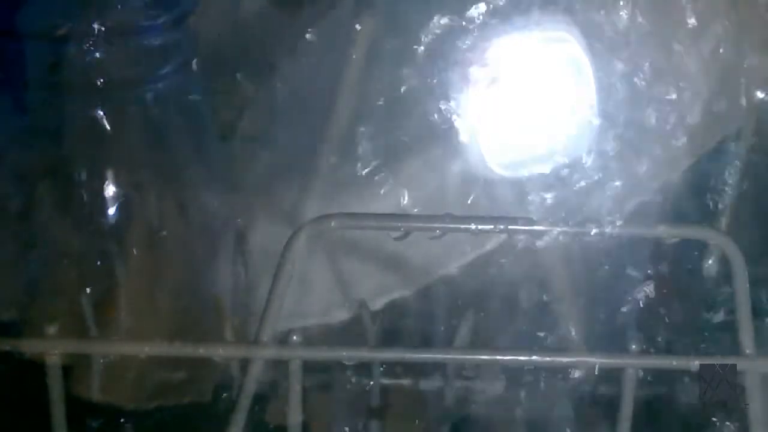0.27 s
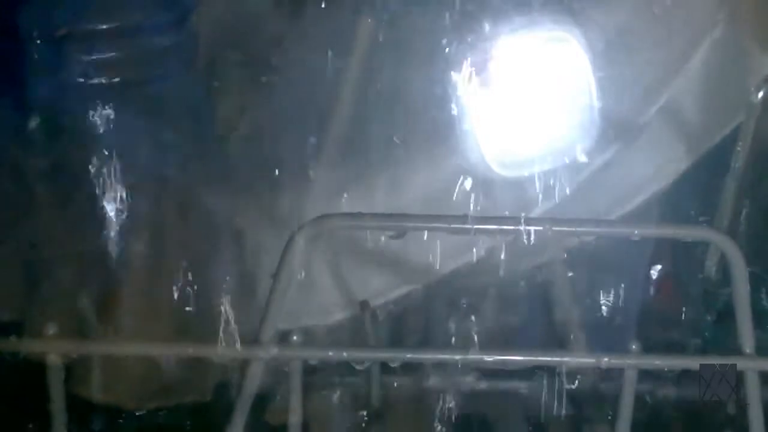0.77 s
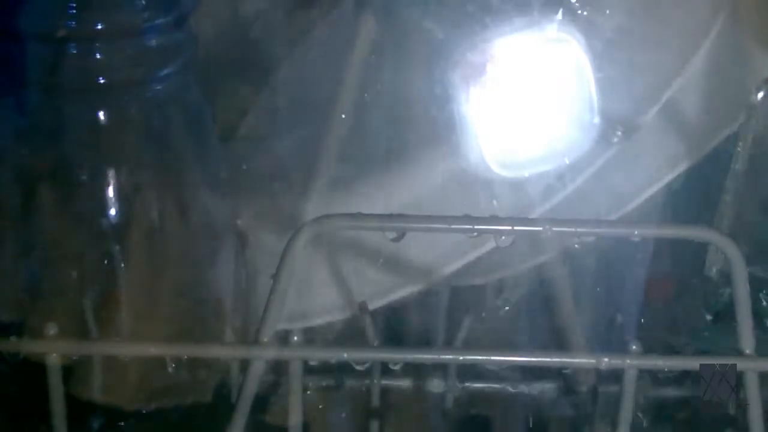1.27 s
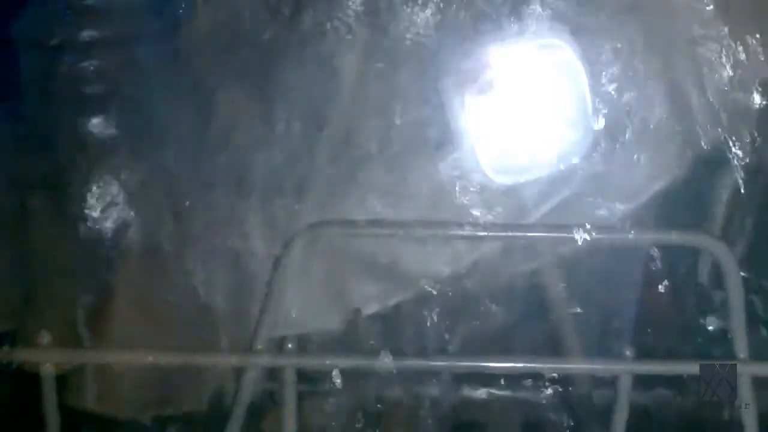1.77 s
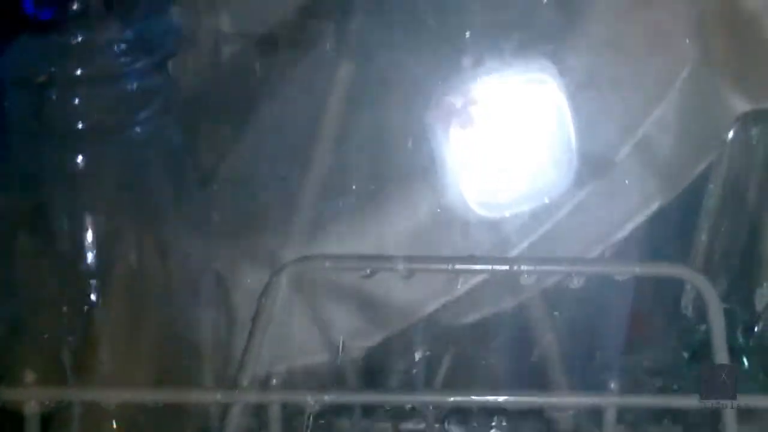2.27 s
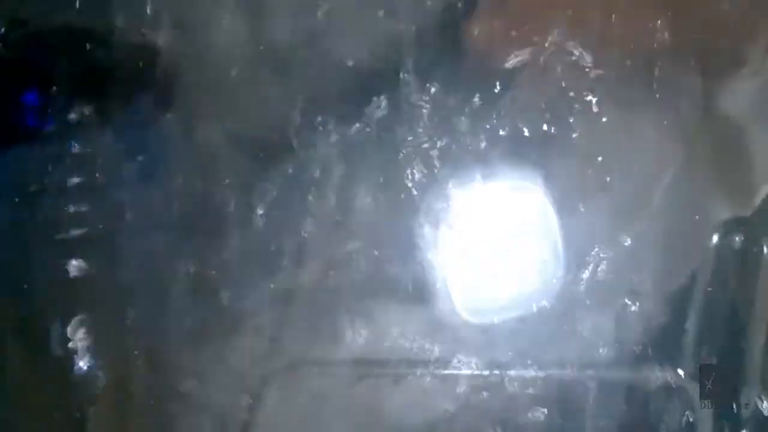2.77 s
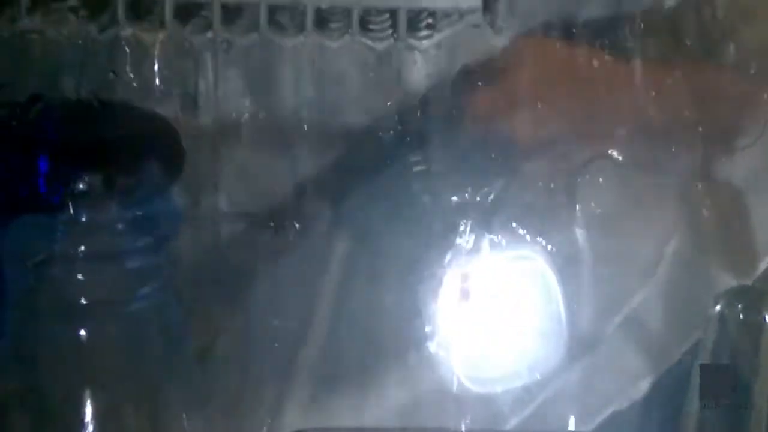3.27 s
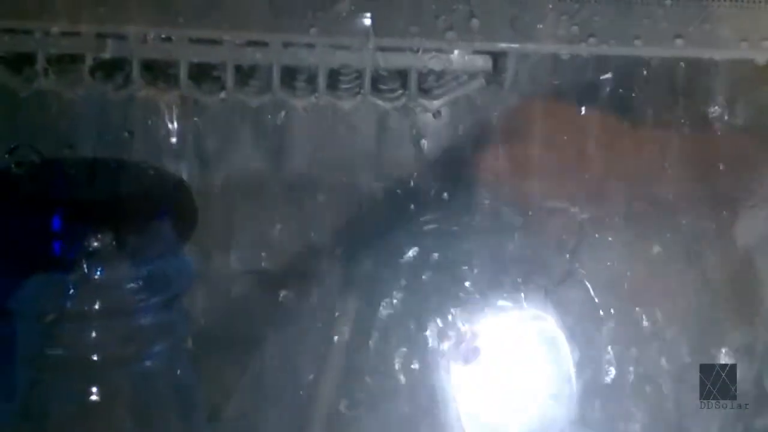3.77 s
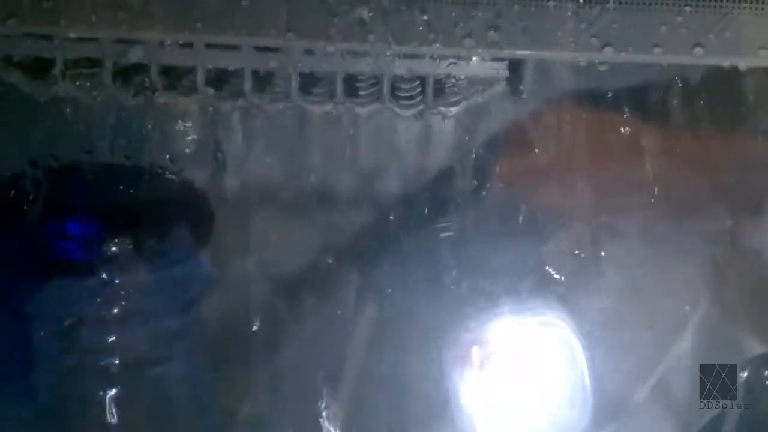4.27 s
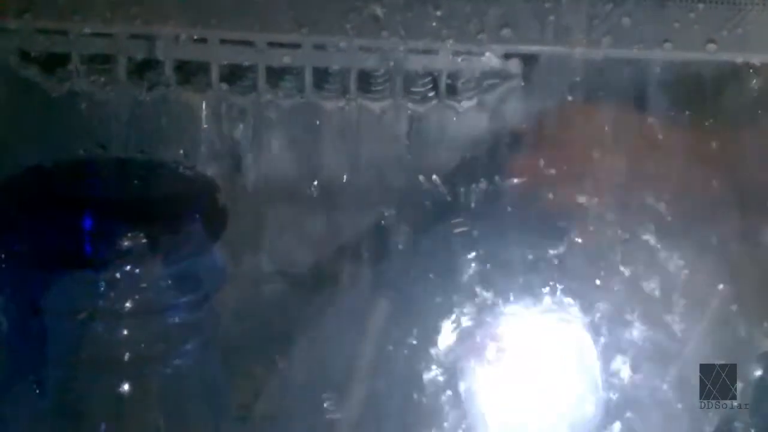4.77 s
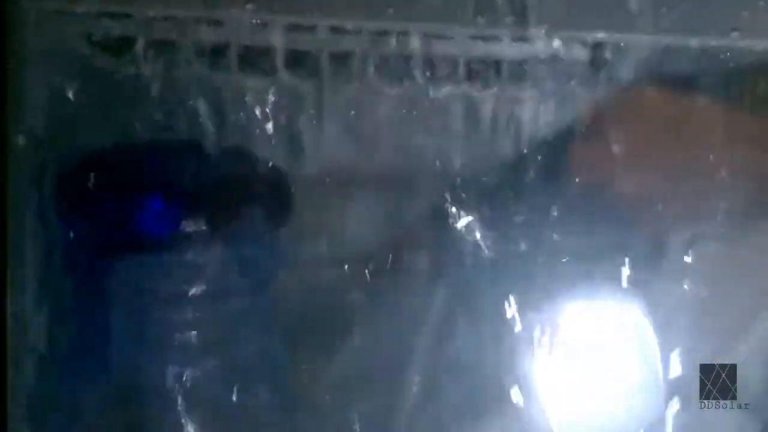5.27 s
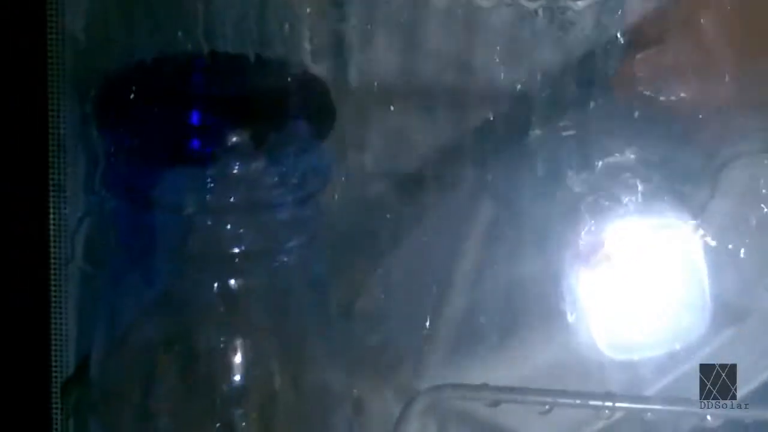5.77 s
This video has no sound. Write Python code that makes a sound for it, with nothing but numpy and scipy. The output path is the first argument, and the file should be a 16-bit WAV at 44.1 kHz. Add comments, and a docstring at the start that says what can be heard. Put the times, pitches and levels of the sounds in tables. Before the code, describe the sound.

A small dishwasher washes throughout, heard from a hand-held microphone right at its door. From the start the pump gives a steady, slightly wavering low hum. Jets of water sweep past in uneven surges, two or three a second: they drum deeply on the door, slosh at the bottom, rush along the walls and patter brightly on the dishes, with many small splashes. From about 1 second, shifting fingers add a deep, uneven rumble. The microphone bumps the door with light, dull knocks at about 2.1 and 2.2 seconds, and again around 3.3. A loud thud comes at 3.7 seconds, a sharper rattling knock at 4.9, the hardest knock at about 5.4, and another loud one at 6 seconds, with faint bumps between. The washing dips very briefly in level after each loud knock and carries on to the end.

```python
"""A small dishwasher washes, heard from a hand-held camera right at its door.
From the start the pump hums and jets of water sweep past: they drum on the door, slosh at the bottom,
rush along the walls, patter on the dishes and splash in the tub. From about 1 s, shifting fingers make
the camera rumble. From 2 s it knocks against the door now and then, hardest at about 5.4 s,
and the level dips briefly after each loud knock."""
import sys
import numpy as np
from scipy import signal
from scipy.fft import rfft, irfft
from scipy.io import wavfile
from scipy.ndimage import uniform_filter1d

SR = 44100
rng = np.random.default_rng(int(sys.argv[2]) if len(sys.argv) > 2 else 0)


def dump(signal):
    """Clip the signal to [-1, 1] and save it as 16-bit WAV at the path in sys.argv[1]."""
    limited = np.clip(np.atleast_2d(signal).T, -1, 1)
    pcm = np.round(limited * 32767).astype(np.int16)
    wavfile.write(sys.argv[1], SR, pcm)


N = 264644
CONTROL_TIMES_S = np.arange(0, N / SR + .001, .001)


def undb(db):
    """Turn decibels into a gain."""
    return 10 ** (np.asarray(db) / 20)


def unit(x):
    """Scale a sound to an average (rms) level of 1."""
    return x / np.sqrt(np.mean(x ** 2))


def band(x, hz, *widths_hz):
    """Let a sound ring around one pitch, once for each width given."""
    for width in widths_hz:
        x = signal.lfilter(*signal.iirpeak(hz, hz / width, SR), x)
    return x


def colour(x, table):
    """Shape a sound by (pitch_hz, level_db) points; it fades steeply beyond the ends."""
    hz, db = np.transpose(table)
    log_hz = np.log(np.fft.rfftfreq(N, 1 / SR) + 1)
    outside = np.maximum(np.log(hz[0]) - log_hz, 0) + np.maximum(log_hz - np.log(hz[-1]), 0)
    gain = undb(np.interp(log_hz, np.log(hz), db) - 60 * outside)
    return unit(irfft(rfft(x) * gain, N))


def wander(per_s):
    """A curve that glides between random values, typically of size 1."""
    step = int(SR / per_s)
    held = np.repeat(rng.standard_normal(N // step + 1), step)[:N]
    return unit(uniform_filter1d(held, step))


def per_sample(slow):
    """Spread curves made once a millisecond over all the samples."""
    return np.array([np.interp(np.arange(N) / SR, CONTROL_TIMES_S, row) for row in np.atleast_2d(slow)])


def swells(rows, rest_db):
    """A quiet resting gain with a rounded swell for each row."""
    power = sum(undb(2 * db) * np.cos(np.pi * np.clip((CONTROL_TIMES_S - middle) / length, -.5, .5)) ** 2
                for middle, length, db in rows)
    return per_sample(np.sqrt(power + undb(2 * rest_db)))[0]


def drops(per_s, spread_db, fade_s, wash_db):
    """Drops land at random over a steady wash; each is a burst that fades 60 dB in fade_s."""
    lands = rng.random(N) < per_s / SR
    sizes = undb(spread_db * np.minimum(rng.exponential(size=N), 3))  # no drop is huge
    bursts = signal.lfilter([1], [1, -np.exp(-np.log(1000) / (fade_s * SR))], lands * sizes)
    return (unit(bursts) + undb(wash_db)) * rng.standard_normal(N)


def flicker(x, edges_hz, depth_db, per_s):
    """Each range of pitch flickers on its own as the water shifts."""
    spectrum, hz = rfft(x), np.fft.rfftfreq(N, 1 / SR)
    parts = (irfft(spectrum * ((hz >= lo) & (hz < hi)), N) for lo, hi in zip(edges_hz, edges_hz[1:]))
    return unit(sum(part * undb(depth_db * wander(per_s)) for part in parts))


def pump():
    """The motor hum wavers with the load; faint high tones tremble in pitch together."""
    # Low motor tones: pitch_hz, width_hz, level_db, waver_share
    hum_tones = [(121.3, 14.4, -46.5, 0.86), (361.4, 15.8, -49.5, 1.64)]
    # Thin high tones: pitch_hz, level_db
    whine_tones = [(5001, -89), (5766, -94), (6487, -93), (7924, -101), (9367, -104), (10088, -100),
                   (10810, -99), (11531, -102)]
    t = np.arange(N) / SR
    hum = 0
    for hz, width, db, share in hum_tones:
        waver = unit(band(rng.standard_normal(N), hz, width, 4 * hz))
        hum += undb(db) * unit(np.sin(2 * np.pi * hz * t) + share * waver)
    hum *= undb(1.63 * wander(5))
    shaky_t = t + np.cumsum(0.000497 * wander(11)) / SR
    whine = sum(undb(db + 1.5 * wander(12)) * np.sqrt(2) * np.sin(2 * np.pi * hz * shaky_t)
                for hz, db in whine_tones)
    return hum + whine


def jet_sweeps():
    """Gains for bottom, walls and dishes: a jet of the turning arm comes fast, weakens and drains off."""
    # Passing jets: start_s, length_s, bottom_lift_db, walls_lift_db, dishes_lift_db
    passing_jets = [(-.1, 0.16, 1, 6.6, 0.75), (0.246, 0.07, 6, 1.9, 1.1), (0.41, 0.43, 1.5, 9.6, 5.2),
                    (0.88, 0.29, 3, 9.2, 5), (1.195, 0.25, 2.5, 3.8, 2.6), (1.612, 0.56, 6, 9.2, 3.9),
                    (2.49, 0.19, 4.5, 4.5, 1.7), (2.677, .36, 2.5, 8.3, 5.2), (3.08, 0.55, 3.5, 8.1, 4.6),
                    (3.85, .44, 3.5, 7.8, 3), (4.405, 0.19, -2.5, 1, 2.3), (4.736, 0.33, 1.5, 4, 2.4),
                    (4.985, 0.36, 2, 8.6, 3.4), (5.347, .12, 2.5, 9.6, 6), (5.697, 0.14, 3, 7.7, 3.2)]
    # Water between jets: bottom_db, walls_db, dishes_db
    rest_db = [-49.5, -60, -64.5]
    rise_s, fall_s, sag_db_per_s = 0.032, 0.082, 3.5
    lift_db = np.zeros((3, len(CONTROL_TIMES_S)))
    for start, length, *db in passing_jets:
        age = CONTROL_TIMES_S - start
        shape = np.clip(np.minimum(age / rise_s, 1 + (length - age) / fall_s), 0, 1)
        lift_db = np.maximum(lift_db, shape * (np.array(db)[:, None] - sag_db_per_s * age))
    return per_sample(undb(lift_db + np.array(rest_db)[:, None]))


def door_drumming():
    """Gushes of water beat on the door, and its panel rings at one low pitch."""
    # Gushes on the door: middle_s, length_s, level_db
    door_gushes = [(.06, 0.13, -39), (.31, 0.082, -40.5), (.42, 0.11, -35.5), (.63, 0.22, -41.5),
                   (.97, 0.068, -39), (1.19, 0.086, -37), (1.41, 0.1, -42), (1.66, 0.14, -39),
                   (1.86, 0.12, -33.5), (2.18, .2, -37.5), (2.4, 0.22, -38), (3.1, 0.048, -40),
                   (3.24, 0.082, -39), (3.39, 0.12, -35), (3.7, 0.06, -36), (3.98, 0.11, -43),
                   (4.33, 0.11, -34), (4.62, 0.11, -44), (4.78, .1, -50), (4.94, 0.092, -35),
                   (5.07, 0.062, -36.5), (5.19, 0.12, -41), (5.29, .06, -38), (5.48, 0.11, -38),
                   (5.65, 0.23, -38.5), (5.84, 0.045, -38.5), (5.99, .1, -34)]
    # The door's deep tone: pitch_hz, level_db
    door_tone = [(30, -47), (60, -14), (91, 1), (112, -6), (170, -1), (230, -1.5), (320, -8), (400, -32)]
    panel_hz, panel_width_hz, panel_db = 172, 24, -3
    gain = swells(door_gushes, rest_db=-44.5) * undb(1.5 * wander(6))
    blows = drops(per_s=69, spread_db=2.1, fade_s=0.17, wash_db=-6.5)
    panel = undb(panel_db) * unit(band(blows, panel_hz, panel_width_hz, panel_hz))
    return gain * unit(colour(blows, door_tone) + panel)


def bottom_slosh():
    """Water sloshes in the bottom of the tub."""
    # The pool's low tone: pitch_hz, level_db
    pool_tone = [(260, -28), (330, -7), (410, -4.5), (500, 2), (690, -5), (880, -16)]
    water = drops(per_s=90, spread_db=1.6, fade_s=0.12, wash_db=3)
    return flicker(colour(water, pool_tone), [0, 330, 450, 600, 2000], depth_db=0.12, per_s=13)


def wall_rush():
    """Water rushes along the walls of the tub."""
    # The walls' middle tone: pitch_hz, level_db
    wall_tone = [(410, -37), (700, -9.5), (977, -0.5), (1250, -9), (1430, -10), (1610, -14), (2300, -31.5),
                 (2990, -56), (5060, -120)]
    water = drops(per_s=85, spread_db=0.89, fade_s=0.09, wash_db=3)
    return flicker(colour(water, wall_tone), [0, 950, 1250, 1600, 9000], depth_db=0.96, per_s=14)


def dish_spray():
    """Spray patters on the dishes and makes them ring."""
    # The spray's bright tone: pitch_hz, level_db
    spray_tone = [(1240, -36), (2100, 0.5), (2220, -5.5), (2640, -3), (2790, 3), (2940, -2.5), (3440, -1),
                  (3720, -1.5), (5140, -9.5), (6680, -23), (11300, -120)]
    # Ringing dishes: pitch_hz, width_hz, level_db
    dish_rings = [(1535, 82, -16.5), (3000, 400, -6.5), (3376, 92, -13), (4960, 38, -21.5), (5300, 32, -34),
                  (6530, 40, -25)]
    patter = drops(per_s=120, spread_db=4, fade_s=0.05, wash_db=8)
    ringing = sum(undb(db) * unit(band(patter, hz, width, hz / 2)) for hz, width, db in dish_rings)
    spray = colour(patter, spray_tone) + ringing
    spray = flicker(spray, [0, 2700, 3400, 4200, 5300, 20000], depth_db=2.37, per_s=14)
    return spray + undb(-7) * droplets(count=900, lo_hz=1718, hi_hz=5320, cycles=6.7, spread_db=2)


def droplets(count, lo_hz, hi_hz, cycles, spread_db):
    """Single drops ping at their own pitch for a few cycles."""
    when, pitch, smallness = rng.random((count, 3)).T
    hz = (lo_hz * (hi_hz / lo_hz) ** pitch)[:, None]
    t = np.arange(SR // 40) / SR
    ping = np.sin(2 * np.pi * hz * t) * np.exp(-t * hz / cycles) * np.minimum(t * hz / 2, 1)
    ping *= undb(-spread_db * np.log(smallness + 0.033))[:, None] * lo_hz / hz  # high drops are quieter
    where = (when * N).astype(int)[:, None] + np.arange(len(t))
    return unit(np.bincount(where.ravel(), ping.ravel(), N)[:N])


def splashes():
    """Water slaps the dishes or sloshes low in the tub: a sudden burst of noise around one pitch."""
    # Slaps and sloshes: start_s, level_db, pitch_hz, fade_s (time to fall 60 dB)
    water_splashes = [(0.076, -62, 4760, 0.11), (.16, -51.5, 2620, 0.1), (0.266, -45.5, 1010, 0.23),
                      (0.387, -56, 1440, 0.22), (0.399, -57.5, 2000, 0.38), (.405, -61.5, 6200, .05),
                      (.426, -54, 3980, .26), (0.569, -62, 4600, .11), (.62, -42.5, 523, 0.38),
                      (.77, -61, 3900, .08), (.867, -57.5, 2400, 0.32), (.96, -47, 556, 0.18),
                      (1.018, -56, 6500, 0.025), (1.03, -54, 2930, 0.13), (1.083, -49, 2040, .09),
                      (1.108, -58, 4300, .06), (1.123, -57, 1200, .069), (1.186, -39.5, 487, .15),
                      (1.194, -65, 6500, .04), (1.491, -51.5, 3240, 0.048), (1.638, -63, 6500, .04),
                      (1.673, -52.5, 1850, 0.28), (1.83, -50, 476, 0.28), (1.847, -61, 2860, 0.079),
                      (2.108, -58, 4050, 0.13), (2.157, -56, 2050, .12), (2.245, -52, 2520, .071),
                      (2.289, -56, 3860, 0.11), (2.307, -53.5, 1920, .21), (2.373, -51.5, 1460, .094),
                      (2.504, -54.5, 2660, 0.15), (2.535, -43, 920, 0.22), (2.705, -53.5, 1460, 0.63),
                      (2.759, -58.5, 4470, .1), (2.868, -63, 1900, 0.27), (2.978, -57, 4700, .06),
                      (3.238, -54.5, 3300, 0.14), (3.289, -54.5, 3300, 0.42), (3.295, -55, 2000, 0.12),
                      (3.322, -54, 3210, 0.13), (3.463, -57, 3100, .1), (3.554, -50, 1400, .1),
                      (3.89, -60, 1890, 0.31), (3.957, -43.5, 1010, 0.041), (4.091, -64, 4060, 0.22),
                      (4.214, -56, 3340, .1), (4.517, -57, 1850, .071), (4.579, -49, 2780, 0.054),
                      (4.632, -59.5, 4170, 0.12), (4.78, -55, 3500, 0.085), (4.879, -50.5, 3000, 0.079),
                      (4.911, -53.5, 4230, 0.14), (5.08, -54, 1490, 0.22), (5.276, -52.5, 2900, .1),
                      (5.516, -55.5, 3340, 0.12), (5.621, -56.5, 3940, .072), (5.666, -60, 1890, 0.38),
                      (5.716, -55, 2830, 0.23), (5.804, -51, 3040, 0.045)]
    rise_s = 0.0013
    out, t = np.zeros(N + SR), np.arange(SR // 4) / SR
    for start, db, hz, fade_s in water_splashes:
        burst = unit(band(rng.standard_normal(len(t)), hz, 0.47 * hz, 0.28 * hz))
        shape = np.exp(-np.log(1000) * t / fade_s) * np.minimum(t / rise_s, 1)
        out[int(start * SR):][:len(t)] += undb(db) * burst * shape
    return out[:N]


def finger_rumble():
    """Fingers shift on the camera: a deep, uneven rumble."""
    # Finger movements: middle_s, length_s, level_db
    finger_shifts = [(.96, 0.088, -60), (1.08, 0.14, -55), (1.64, .1, -52), (1.88, 0.18, -51),
                     (2.06, 0.07, -42), (2.23, .14, -42), (2.43, 0.18, -46), (2.79, 0.22, -51),
                     (3.08, 0.22, -48), (3.22, 0.087, -50), (3.4, .12, -41), (3.69, 0.086, -37),
                     (3.98, .16, -55), (4.62, .2, -54), (4.93, 0.12, -46), (5.08, .12, -49),
                     (5.38, .14, -40.5), (5.49, 0.14, -44), (5.67, 0.21, -40), (6.0, 0.12, -42)]
    rumble = rng.standard_normal(N)
    for hz, width in (45, 56), (42, 60), (49, 70):
        rumble = band(rumble, hz, width)
    return swells(finger_shifts, rest_db=-62) * unit(rumble)


def camera_knocks():
    """The camera hits the door: its body gives and springs back, with a crack, a tick and a rattle."""
    # Knocks: start_s, level_db, contact_ms, tick_db, crack_db, rattle_db, direction (+1 in, -1 out)
    door_knocks = [(2.051, -20, 3.15, -41, -60, -29, -1), (2.217, -20, 3.96, -34, -60, -22, -1),
                   (2.421, -31, 8.9, -47.5, -60, -27, -1), (3.224, -28, 3.5, -40, -60, -12, 1),
                   (3.37, -21.5, 4.8, -38, -61, -6, -1), (3.677, -7, 3.1, -47, -60, -20, -1),
                   (4.592, -28, 3.6, -33, -59, -14, -1), (4.87, -27, 3.4, -45, -60, -13, 1),
                   (4.907, -11.5, 3.26, -21, -34, -31, 1), (4.924, -22.5, 7.2, -33, -50, -8.5, 1),
                   (5.351, -3, 2.65, -13, -34, -32, 1), (5.524, -27, 3.65, -37, -55, -22, -1),
                   (5.627, -24.5, 3.6, -47, -58, -11, 1), (5.992, -6, 2.88, -26.5, -47, -9, 1)]
    # Dull rings of the camera body: pitch_hz, width_hz, level_db
    dull_rings = [(332, 370, 7), (212, 88, -13), (638, 100, 5.5), (1000, 250, 4)]
    # Its bright rings: pitch_hz, width_hz, level_db
    bright_rings = [(930, 87, 6), (1230, 115, 4), (1596, 480, 6), (2175, 260, 2.5), (2420, 60, -3.5),
                    (3440, 410, -10)]
    out, t = np.zeros(N + SR), np.arange(SR // 5) / SR
    for start, level_db, contact_ms, tick_db, crack_db, rattle_db, direction in door_knocks:
        progress = np.minimum(t * 1000 / contact_ms, 1)
        push = -np.sign(direction) * np.sin(2 * np.pi * progress)
        push *= np.sin(np.pi * progress ** 1.61)  # a soft contact has rounded ends
        rattle = undb(rattle_db) * rng.standard_normal(len(t)) * np.exp(-t / 0.032) * progress
        force = push + band(rattle, 350, 530)
        thud = sum(undb(db) * band(force, hz, width) for hz, width, db in dull_rings)
        chatter = np.exp(-t / .004) + .2 * np.exp(-t / .016)  # loose parts keep moving
        touch = rng.standard_normal(len(t)) * chatter
        tick = sum(undb(db) * unit(band(touch, hz, width, hz / 2, hz)) for hz, width, db in bright_rings)
        snap = rng.standard_normal(len(t)) * np.exp(-t / .0013)
        crack = band(band(snap, 3000, 5000), 5000, 15000)
        for db, part in (0, thud), (tick_db, tick), (crack_db, crack):
            out[int(start * SR):][:len(t)] += undb(level_db + db) * part / np.abs(part).max()
    return out[:N]


def scene():
    """All the sounds meet at one microphone."""
    bottom, walls, dishes = jet_sweeps()
    water = door_drumming() + bottom * bottom_slosh() + walls * wall_rush() + dishes * dish_spray()
    return (water + splashes() + pump() + camera_knocks() + finger_rumble())[None]


def record(dry):
    """The camera turns itself down briefly after a loud knock, adds hiss and cuts the highest treble."""
    # The amplifier's hiss: pitch_hz, level_db
    hiss_tone = [(2000, 5), (5000, 6), (7000, 4.5), (9000, 2), (11000, 1), (15800, -2)]
    dip_from_db, dip_strength, recover_s = -20, 0.31, 0.048
    hiss_db, top_hz = -74.5, 15700
    decay = np.exp(-1 / (recover_s * SR))
    smoother = [1 - decay], [1, -decay]
    loudness = np.sqrt(signal.lfilter(*smoother, signal.lfilter(*smoother, dry ** 2)))
    gain = (1 + (loudness / undb(dip_from_db)) ** 2) ** -dip_strength
    hiss = undb(hiss_db) * colour(rng.standard_normal(N), hiss_tone)
    return signal.sosfilt(signal.ellip(10, .2, 70, top_hz, fs=SR, output="sos"), dry * gain + hiss)


dry = scene()
out = record(dry)
dump(out)
```